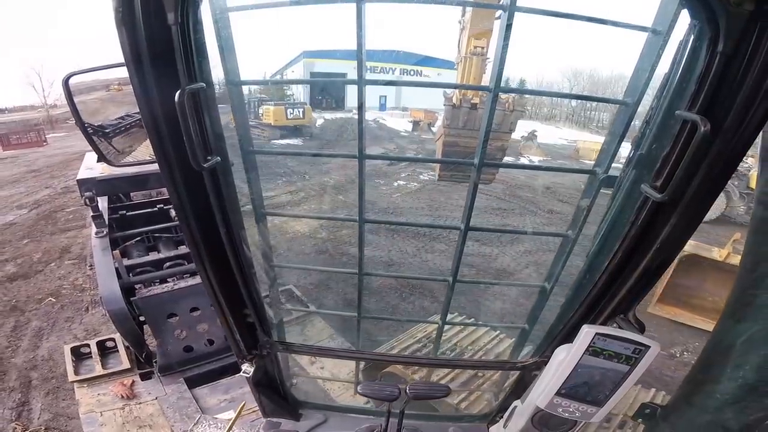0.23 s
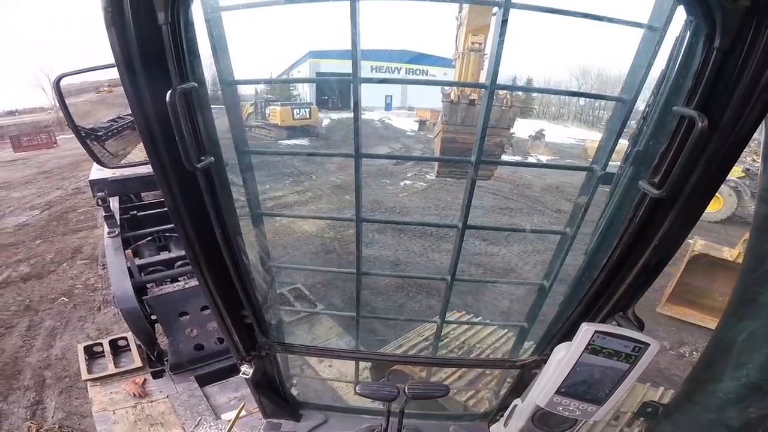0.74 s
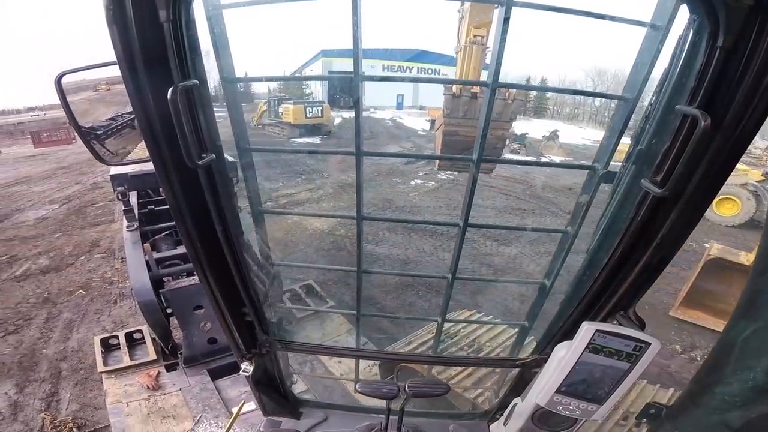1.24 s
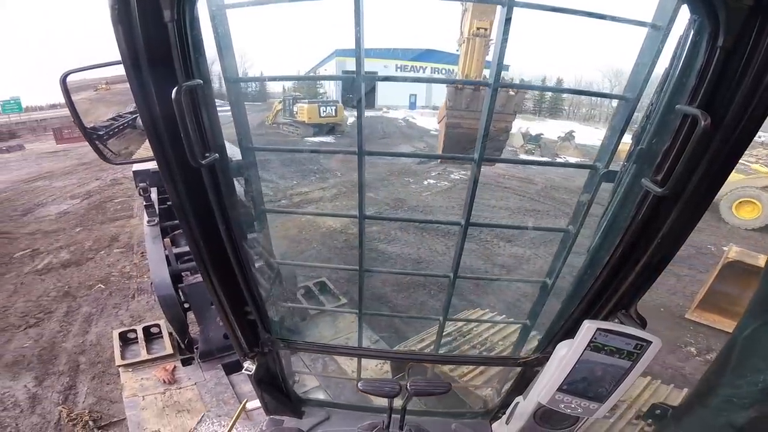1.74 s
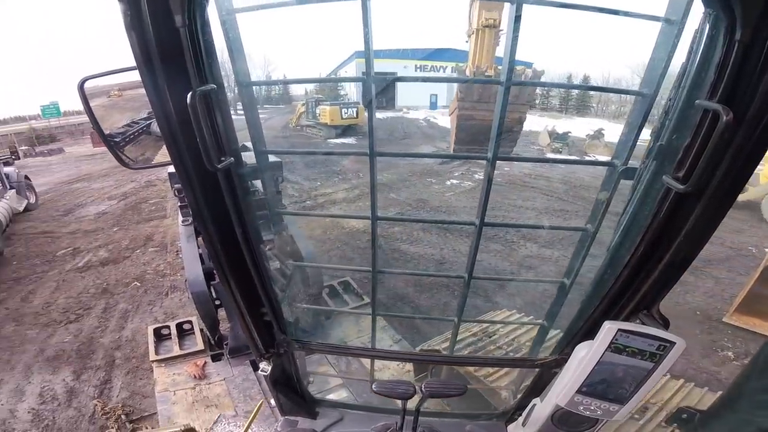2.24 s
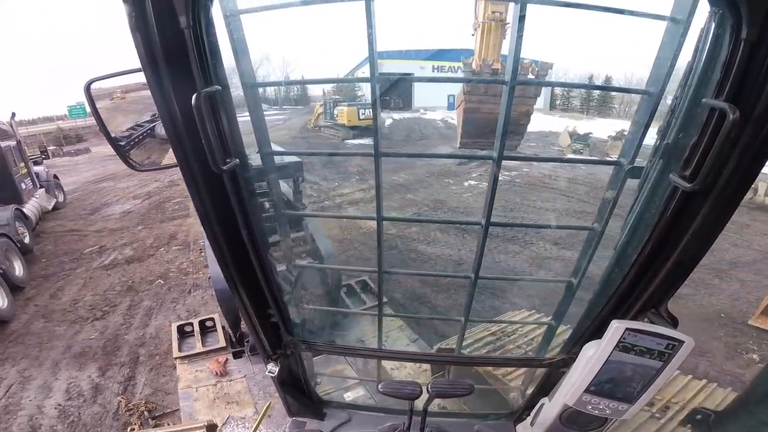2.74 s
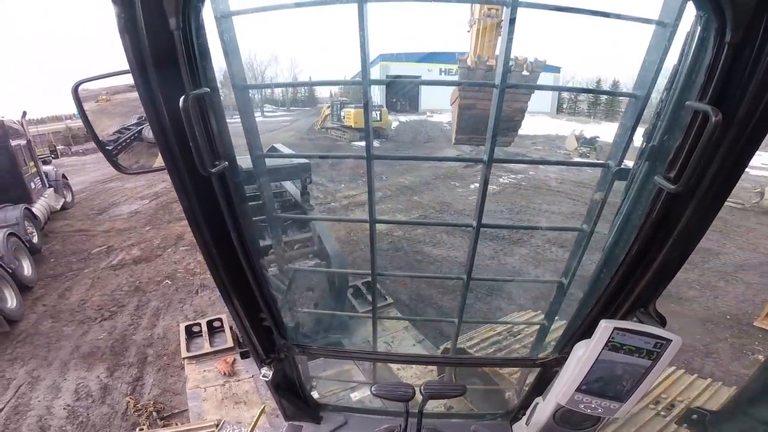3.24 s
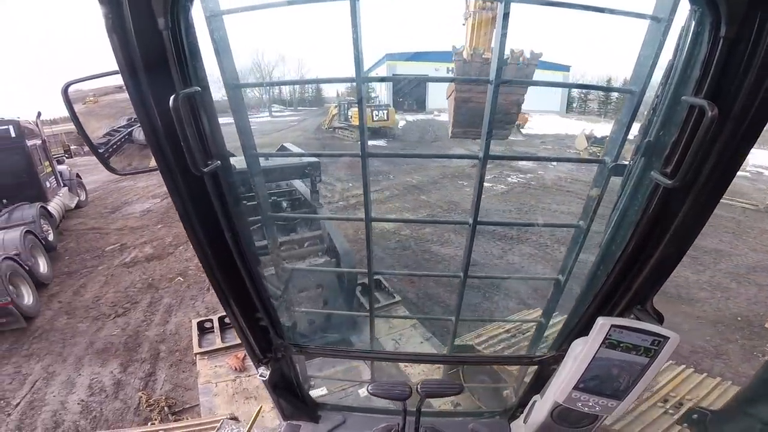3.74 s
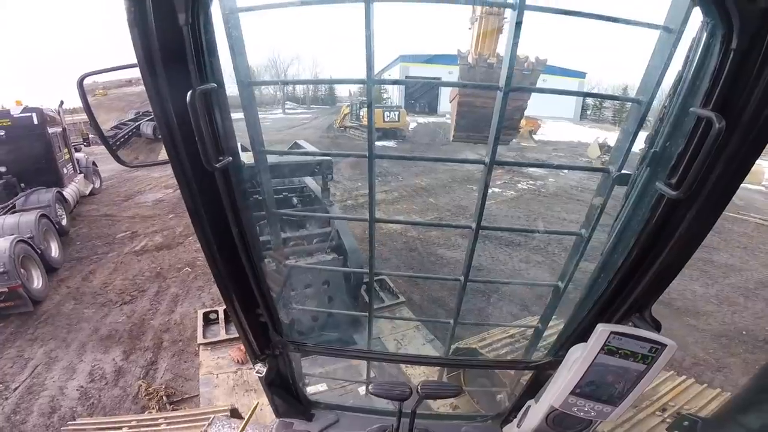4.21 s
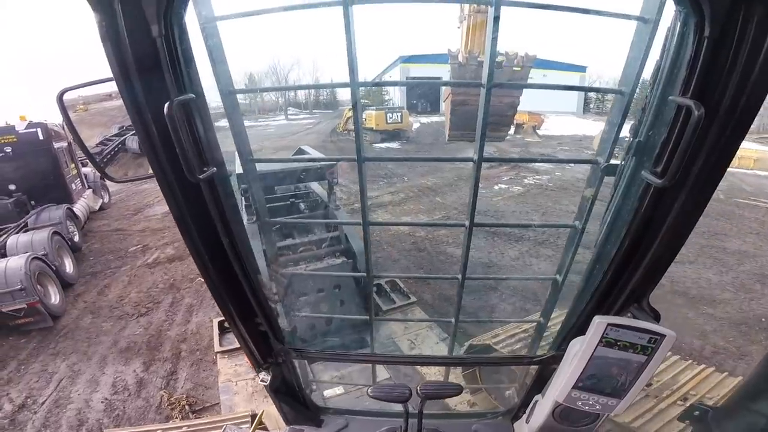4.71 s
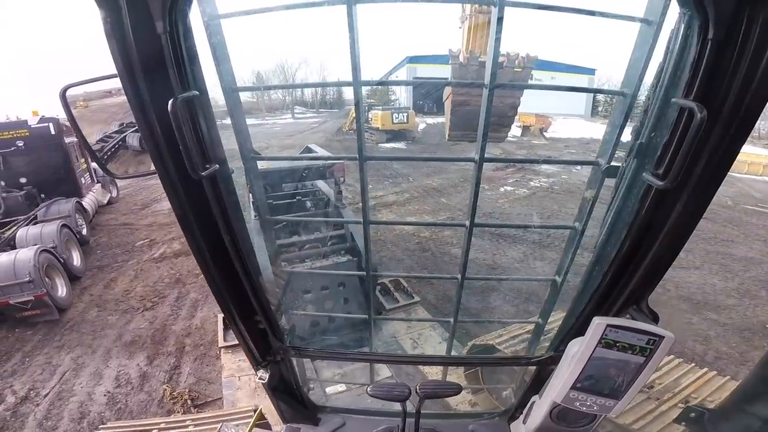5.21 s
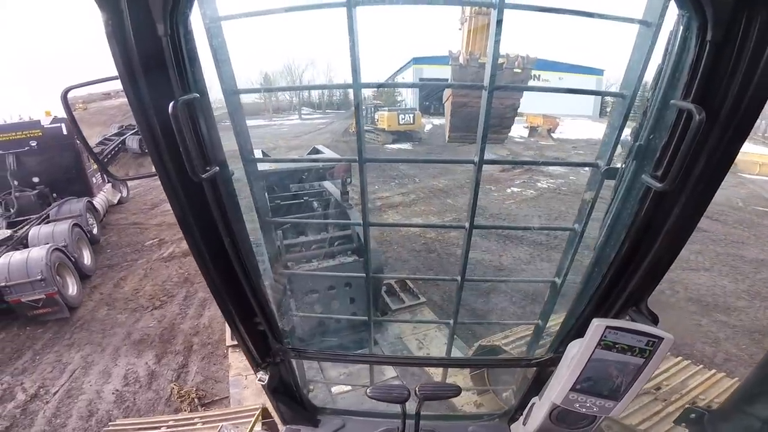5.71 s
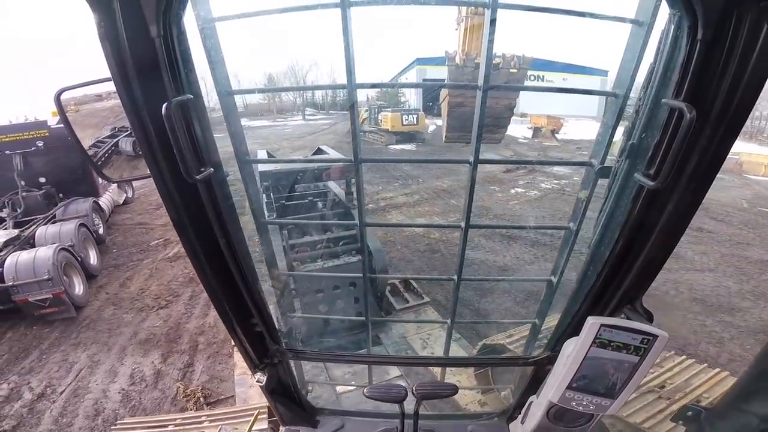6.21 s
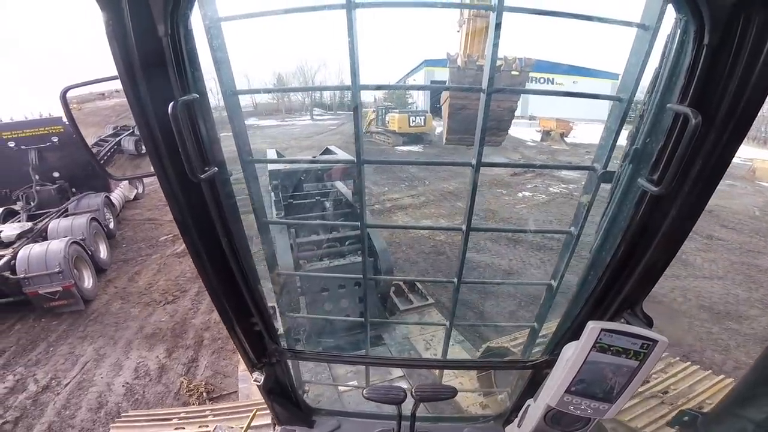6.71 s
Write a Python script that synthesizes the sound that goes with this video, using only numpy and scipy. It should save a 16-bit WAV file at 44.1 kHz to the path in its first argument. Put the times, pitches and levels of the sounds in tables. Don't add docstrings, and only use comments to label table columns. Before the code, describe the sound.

From inside a small glass-walled excavator cab, a diesel runs throughout near idle: a very deep, pulsing boom with rough growl, rumble, metallic clatter and steady airy hiss. From about 0.6 to 1.5 seconds the boom swells strongly as the pitch dips slightly. A thin, uneven bearing squeak begins around 0.7 and comes and goes until 3.7, and a soft knock lands at 1.4. From 1.7 to 3.4 the boom thins while a wavering hydraulic hum stands out, with fine high oil hiss and faint ticking. Around 3.75 the engine pitch jumps briefly with a dull knock, then sags by 4.5 as the swing stops. The boom returns, fuller and steadier, with less hum and a slightly lower hiss. Between 6.0 and 6.8 several dull steel knocks arrive, hardest near 6.4 alongside a short squeal, as the swing restarts.

```python
import sys
import numpy as np
from scipy import signal
from scipy.fft import rfft, irfft, next_fast_len
from scipy.io import wavfile
from scipy.ndimage import uniform_filter1d, map_coordinates

SR = 44100
rng = np.random.default_rng(int(sys.argv[2]) if len(sys.argv) > 2 else 0)


def log_audio(samples):
    frames = np.atleast_2d(samples).T
    limited = np.clip(frames, -1, 1)
    pcm = np.round(limited * 32767).astype(np.int16)
    wavfile.write(sys.argv[1], SR, pcm)


def gain_from_db(level_db):
    decades = np.asarray(level_db, float) / 20
    return 10 ** decades


N = 306495

# start_s, firing_hz, boom_db, pump_hum_db
ENGINE_RUN = [(0.0, 46.16, -19.5, -33.0), (0.1, 45.4, -24, -35.5), (0.2, 45.7, -21.5, -32.5),
              (0.3, 45.6, -21, -37), (0.4, 45, -16.5, -31), (0.5, 44.8, -17.5, -37),
              (0.6, 44.38, -13.0, -34), (0.7, 44.3, -9, -32), (0.8, 43.77, -9.0, -37.0),
              (0.9, 43.97, -9.0, -38.0), (1.0, 43.97, -9.5, -36.0), (1.1, 43.92, -9.0, -34),
              (1.2, 43.94, -9.0, -36.0), (1.3, 44, -9.0, -44), (1.4, 44.36, -10.0, -65.0),
              (1.5, 44.78, -10.5, -60), (1.6, 45.2, -13.0, -41), (1.7, 45.27, -17.5, -32),
              (1.8, 45.8, -29, -30.0), (1.9, 45.91, -20, -29.0), (2.0, 45.97, -15, -28),
              (2.1, 46.36, -18.0, -30), (2.2, 46.04, -19, -28.0), (2.3, 46.08, -15.5, -27.0),
              (2.4, 45.93, -18.0, -27.0), (2.5, 46, -18, -28), (2.6, 45.8, -20.0, -28),
              (2.7, 45.73, -25, -29), (2.8, 45.7, -22.5, -28.5), (2.9, 45.74, -26, -28.5),
              (3.0, 45.38, -31.0, -30), (3.1, 45.4, -33, -29.5), (3.2, 45.25, -22.5, -30.0),
              (3.3, 45.36, -20, -29.5), (3.4, 45.16, -25, -28.5), (3.5, 45.05, -19, -41),
              (3.6, 45.28, -23.0, -39), (3.65, 45.67, -17, -29), (3.7, 46.35, -25, -40),
              (3.75, 48.04, -12, -26.5), (3.8, 48.4, -11.5, -24), (3.9, 48.52, -12.5, -37),
              (4.0, 48.0, -16.5, -40), (4.1, 46.93, -21, -39.5), (4.2, 46.58, -12.5, -43),
              (4.3, 45.86, -18.5, -43.0), (4.4, 44.25, -21.5, -39), (4.5, 43.4, -11, -47),
              (4.6, 43.7, -9, -44), (4.7, 43.63, -10.5, -47.0), (4.8, 43.58, -11, -52),
              (4.9, 43.91, -10.0, -52), (5.0, 43.88, -11.5, -49.0), (5.1, 44.06, -11.5, -51.0),
              (5.2, 44.36, -11.5, -37), (5.3, 44.47, -14.0, -46), (5.4, 44.5, -13.5, -43),
              (5.5, 44.73, -14.0, -49), (5.6, 44.74, -15.5, -47.0), (5.7, 44.99, -15.0, -40),
              (5.8, 44.7, -18.5, -53.0), (5.9, 44.3, -15.0, -56), (6.0, 43.88, -12.5, -53),
              (6.1, 43.58, -11.0, -37), (6.2, 43.3, -10.5, -37.5), (6.3, 43.45, -10.0, -42),
              (6.4, 43.86, -10.0, -40), (6.5, 44.45, -11.5, -41), (6.6, 44.9, -12.5, -38),
              (6.7, 45.05, -17.5, -37.5), (6.8, 45.4, -21, -43), (6.95, 45.48, -17.5, -37)]
TONE_MULTIPLES = [2, 3, 6, 7, 10, 13]
# start_s, rumble_db, block_db, hiss_db, frame_db
LOAD_LEVELS = [(0.03, -28.5, -35, -42, -33.5), (0.18, -29.5, -34, -43.5, -34),
               (0.45, -26, -34, -44.5, -34.5), (1.02, -28.5, -35.5, -45, -36), (1.23, -32, -37, -46, -38),
               (1.71, -25.5, -36, -45.5, -35.5), (1.9, -24.5, -35, -43.5, -33.5),
               (2.15, -24, -35.5, -43, -33), (2.67, -24, -35.5, -44, -35.5),
               (3.03, -25, -35.5, -43.5, -34.5), (3.53, -22.5, -35.5, -43.5, -36),
               (3.68, -22, -35, -44, -32.5), (3.76, -26, -33, -42, -34.5), (3.8, -26, -35.5, -43, -38.5),
               (4.22, -28.5, -36, -43.5, -38.5), (4.54, -29.5, -35.5, -44, -41.5),
               (4.93, -28, -35, -43, -39.5), (5.35, -31.5, -35, -43, -38), (5.83, -26, -35.5, -43, -39.5),
               (5.86, -28, -37, -42, -37), (6.0, -27.5, -33.5, -43.5, -36.5), (6.21, -25.5, -34, -44, -39),
               (6.4, -26.5, -33.5, -43, -36), (6.9, -24.5, -34, -42, -36.5)]
# start_s, share (0-1)
SWING_FLOW = [
    (0, 0.8),
    (1.2, 0.83),
    (1.6, 1),
    (3.6, 0.9),
    (3.9, .05),
    (6, 0.04),
    (6.95, 0.4),
]


def unit(x):
    return x / np.sqrt(np.mean(x ** 2) + 1e-20)


def curves(rows):
    start_s, *columns = np.transpose(rows)
    t = np.arange(N) / SR
    return [np.interp(t, start_s, column) for column in columns]


def wobble(rate_hz):
    knots = rng.standard_normal(int(N * rate_hz / SR) + 4)
    return map_coordinates(knots, [np.arange(N) * rate_hz / SR])


def coloured(x, points):
    size = next_fast_len(N + 8192)
    hz, db = np.transpose(points)
    log_hz = np.log(np.fft.rfftfreq(size, 1 / SR) + 1)
    gain = gain_from_db(np.interp(log_hz, np.log(hz + 1), db, -120, -120))
    return unit(irfft(rfft(x, size) * gain, size)[:N])


def rush(points, patchy_db):
    spectrum = signal.stft(rng.standard_normal(N), nperseg=512)[2]
    field = uniform_filter1d(rng.standard_normal(spectrum.shape), 5, 0)
    field = uniform_filter1d(field, 8, 1)
    patchy = signal.istft(spectrum * gain_from_db(patchy_db * unit(field)), nperseg=512)[1][:N]
    return coloured(patchy, points)


def cab(x, t60, wet_db):
    t = np.arange(SR // 10) / SR
    tails = rng.standard_normal((2, len(t))) * gain_from_db(-60 * t / t60)
    tails = tails / np.linalg.norm(tails[0])
    echoes = signal.fftconvolve(x[None], tails, axes=1)[:, :N]
    turn = np.pi / 2 * np.clip(curves(SWING_FLOW)[0], 0, 1)
    wet = gain_from_db(wet_db) * (np.sin(turn) * echoes[0] + np.cos(turn) * echoes[1])
    return (x + wet) / np.sqrt(1 + gain_from_db(2 * wet_db))


def oil():
    # hz, db per Hz
    flow_colour = [(6500, -20), (7300, 1), (8100, -6.5), (8800, 0.5), (9800, -14)]
    # hz, db per Hz
    relief_colour = [(4500, -21), (5150, -1), (5700, -10.5), (6100, -22), (6750, -9.5), (7500, -26)]
    share = np.clip(curves(SWING_FLOW)[0], 0, 1)
    swinging = gain_from_db(-62.5) * share * rush(flow_colour, patchy_db=3)
    resting = gain_from_db(-57.5) * (1 - share) * rush(relief_colour, patchy_db=3.5)
    return swinging + resting


def panels():
    # pitch_hz, width_hz, level_db
    modes = [(419, 33, 0), (530.8, 28, -5), (678, 25, -2), (800, 31, -9), (1000, 40, -5), (1105, 31, -10.5),
             (1458, 70, -10), (1700, 67, -22.5), (1954, 58, -15.5), (2207, 19, -23), (2565, 50, -16),
             (2740, 80, -20.5)]
    f = np.fft.rfftfreq(N, 1 / SR)
    white = rfft(rng.standard_normal(N))
    out = np.zeros(N)
    for hz, width_hz, db in modes:
        half = width_hz / 2
        ring = irfft(white * half ** 2 / ((f - hz) ** 2 + half ** 2), N)
        out += gain_from_db(db + 2.5 * wobble(1.63)) * ring
    return unit(out)


def clatter(firings):
    # hz, db per Hz
    rumble_colour = [(15, -11), (25, -4.5), (40, -9), (60, -3.5), (100, -2), (160, -6.5), (200, -23.5),
                     (260, -44.5)]
    frame_colour = [(150, -26), (185, 0.5), (215, -7.5), (260, -5), (330, -4.5), (400, -7.5), (480, -30.5)]
    block_colour = [(300, -32), (390, -5), (450, -6), (680, -3.5), (880, -8), (1100, -3), (1300, -12.5),
                    (1600, -9), (1900, -16), (2600, -31)]
    hiss_colour = [(1200, -20.5), (2000, -1), (2800, -2), (3900, -8.5), (4450, -11), (5200, -5),
                   (5700, -15.5), (6030, -22), (6600, -15.5), (8000, -19.5), (9200, -22.5), (10200, -30),
                   (12500, -35.5), (15300, -39.5)]
    cylinder_levels = [0.29, -1.1, 1.5, -0.3, -0.43, -1.7]
    rumble_db, block_db, hiss_db, frame_db = curves(LOAD_LEVELS)
    cylinder_db = np.interp(firings % 6, np.arange(7), cylinder_levels + cylinder_levels[:1])
    puff = np.cos(2 * np.pi * (firings - .4))
    rumble = gain_from_db(rumble_db - 10.5) * rush(rumble_colour, patchy_db=3.0)
    frame = gain_from_db(frame_db - 5) * rush(frame_colour, patchy_db=1.5)
    block = rush(block_colour, patchy_db=0.3) + gain_from_db(-2) * panels()
    block *= gain_from_db(block_db - 1.0 + 0.86 * cylinder_db + 0.55 * puff)
    hiss_db = hiss_db + .6 * cylinder_db + .5 * puff + 0.46 * wobble(18)
    hiss = gain_from_db(hiss_db) * rush(hiss_colour, patchy_db=0.97)
    return rumble + frame + block + hiss


def knocks():
    # start_s, level_db, t60_s
    impacts = [
        (1.4, -42, .05),
        (2.94, -41, 0.07),
        (3.75, -41, .12),
        (6.04, -40, .05),
        (6.3, -42, 0.05),
        (6.435, -35, 0.078),
        (6.57, -41, 0.068),
        (6.8, -42, 0.061),
    ]
    # hz, db
    steel_colour = [(300, -23), (900, -5.5), (2700, -7), (4000, -5), (5200, -19), (6000, -25), (7000, -10),
                    (8000, -21), (9500, -26), (11000, -45)]
    t = np.arange(N) / SR
    shape = np.zeros(N)
    for start_s, db, t60 in impacts:
        attack = np.clip((t - start_s) / .016, 0, 1) ** 2
        shape += attack * gain_from_db(db + 8 - 60 * np.maximum(t - start_s, 0) / t60)
    return shape * rush(steel_colour, patchy_db=2.0)


def valve(firings):
    # start_s, level_db
    tick_levels = [(0.03, -73.5), (0.58, -75), (0.76, -76), (1.71, -79), (1.81, -75), (3.45, -78),
                   (3.68, -66), (3.7, -76), (6.78, -78), (6.9, -79)]
    window = np.exp(-((firings + 3.2) % 6 - 3) ** 2 / .3)
    level = gain_from_db(curves(tick_levels)[0] - 0.5 + 2.5 * wobble(6))
    level *= .25 + curves(SWING_FLOW)[0]
    return level * window * rush([(9900, -25.5), (10800, -1), (11800, -19)], patchy_db=0.5)


def squeal():
    # start_s, level_db, pitch_hz
    squeals = [
        [(0.7, -73, 4330), (0.72, -57, 4320), (0.77, -68, 4342), (0.83, -55, 4360), (0.92, -65, 4351),
         (0.99, -53, 4350), (1.15, -61, 4369), (1.4, -49, 4410), (1.48, -66, 4441), (1.54, -49, 4460),
         (1.59, -56, 4408), (2.08, -52, 4385), (2.21, -52, 4364), (2.23, -47.5, 4413), (2.7, -55, 4334),
         (3.01, -50, 4310), (3.09, -62, 4290), (3.1, -49, 4280), (3.15, -68, 4280), (3.29, -46, 4293),
         (3.33, -62, 4246), (3.37, -47, 4300), (3.71, -54, 4270), (3.73, -69, 4180), (3.75, -56, 4160)],
        [(6.38, -53, 4223), (6.428, -61, 3900), (6.444, -43, 4090), (6.498, -65, 4144), (6.516, -51, 4147),
         (6.704, -52, 4226), (6.9, -60, 4160)],
    ]
    t = np.arange(N) / SR
    out = np.zeros(N)
    for rows in squeals:
        db, hz = curves(rows)
        fade = np.clip(np.minimum(t - rows[0][0], rows[-1][0] - t) / .05, 0, 1)
        catches = unit(gain_from_db(1.2 * wobble(45)) * wobble(290))
        carrier = np.sqrt(2) * np.sin(2 * np.pi * np.cumsum(hz) / SR)
        out += fade * gain_from_db(db - 2.5) * catches * carrier
    return out


def cycle_comb(firings, db, memory, drift):
    cycle = firings / 6
    count, size = int(firings[-1] / 6) + 2, 4096
    fresh = rng.standard_normal((count, len(db))) + 1j * rng.standard_normal((count, len(db)))
    keep = np.clip(memory, 0, .95)
    change = signal.lfilter([np.sqrt(1 - keep ** 2)], [1, -keep], fresh, axis=0)
    steady = fresh[0] / abs(fresh[0])
    shapes = irfft(gain_from_db(db) * (steady + drift * change), size)
    wrapped = np.c_[shapes, shapes[:, 0]]
    return unit(map_coordinates(wrapped, [cycle, cycle % 1 * size], order=1))


def growl(firings):
    # cycle_order, level_db
    low_orders = [(3, -4), (4, -12.5), (5, -1), (7, -10.5), (8, -8.5), (9, -0.5), (10, -2), (11, -4),
                  (13, -7.5), (14, 0.5), (15, -10), (16, -9), (17, -8), (19, -10.5), (20, -6.5), (21, 0),
                  (22, -5), (24, -7), (25, -13.5), (26, -8.5), (30, -14.5), (31, -14.5), (32, -7),
                  (33, -22), (34, -16.5), (40, -20.5), (44, -13.5), (48, -11.5)]
    # hz, db
    shell_response = [(330, -26.5), (400, -9.5), (520, 4), (620, -9.5), (700, -6), (850, -10), (1050, -7),
                      (1500, -9), (2200, -32.5)]
    rumble_db, block_db, _, frame_db = curves(LOAD_LEVELS)
    order = np.arange(300)
    listed_db = np.full(len(order), -90.)
    for k, db in low_orders:
        listed_db[int(round(k))] = db
    below = order < 23
    high_db = 3.2 * (order % 6 == 0) + 1.8 * (order % 3 == 0)
    high_db[6 * np.array([1, 9] + TONE_MULTIPLES)] = -60
    low = cycle_comb(firings, listed_db - 90 * ~below, memory=.82, drift=.65)
    middle = cycle_comb(firings, listed_db - 90 * below, memory=.9, drift=.5)
    high = coloured(cycle_comb(firings, high_db, memory=0.72, drift=0.86), shell_response)
    return gain_from_db(rumble_db - 2.5) * low + gain_from_db(frame_db - 3.5) * middle + gain_from_db(block_db - 3) * high


def tones(firings):
    # start_s, then level_db of each of TONE_MULTIPLES
    harmonic_levels = [(0.0, -30, -46.0, -47.0, -39, -53, -61.0), (0.2, -32, -41, -42.5, -55, -46, -61),
                       (0.4, -35, -32, -44, -55, -45.5, -58), (0.6, -40, -35, -47.0, -50, -29, -44),
                       (0.79, -34, -36.0, -52, -58, -34, -38), (0.99, -38, -35, -61, -40, -35, -38.5),
                       (1.19, -46, -36, -77.0, -41.5, -38, -38.5),
                       (1.39, -42, -32, -39, -49.5, -34.5, -42.5), (1.59, -29.0, -46, -43.0, -40, -40, -67),
                       (1.79, -28.0, -35.0, -65.0, -44, -38, -51.0), (1.99, -41, -57, -41.5, -45, -43, -57),
                       (2.18, -42, -39.0, -41.5, -51, -44, -52), (2.38, -45, -49, -45, -46.0, -43, -56),
                       (2.58, -47, -34, -63, -49, -38.5, -57), (2.78, -35, -37, -56, -48, -33, -51),
                       (2.98, -46, -37.0, -44, -54, -34.5, -46), (3.18, -32, -39, -41, -52, -36, -44),
                       (3.38, -27, -44, -38, -45, -40, -45), (3.57, -25.5, -26.5, -38.5, -45, -38.5, -44),
                       (3.77, -33, -32.5, -36, -60.0, -53.0, -64.0),
                       (3.97, -30.5, -38, -36.5, -53, -49.0, -60.0),
                       (4.17, -30.0, -32.5, -51, -66.0, -67.0, -67.0),
                       (4.37, -29, -40.0, -41.5, -48, -62, -68), (4.57, -36, -46, -67, -57, -52.0, -59),
                       (4.77, -38.0, -39, -47, -66, -54, -45), (4.96, -40, -49, -46.5, -58, -68.0, -51),
                       (5.16, -37, -49, -48.5, -61, -74, -40), (5.36, -29.5, -46, -44, -56, -71, -61),
                       (5.56, -33, -36.0, -41, -50, -64.0, -62), (5.76, -34, -41, -43.5, -42.5, -61, -56),
                       (5.96, -41, -45, -45.5, -55, -53, -48), (6.16, -38, -60.0, -44, -46.0, -39, -49),
                       (6.35, -35, -47, -36, -35.5, -36.5, -45), (6.55, -41, -48, -46.5, -42.5, -54, -59),
                       (6.75, -37.0, -32, -41, -42, -52, -61), (6.95, -40, -41, -40, -51, -54, -59)]

    def sine(multiple):
        return np.sqrt(2) * np.sin(2 * np.pi * (multiple * firings + rng.random()))

    _, boom_db, hum_db = curves(ENGINE_RUN)
    out = gain_from_db(boom_db + .7 * wobble(16)) * sine(1)
    out += gain_from_db(hum_db + .8 * wobble(25)) * sine(9)
    for multiple, db in zip(TONE_MULTIPLES, curves(harmonic_levels)):
        out += gain_from_db(db + 0.74 * wobble(9)) * sine(multiple)
    return out


def scene():
    firings = np.cumsum(curves(ENGINE_RUN)[0]) / SR
    noise = cab(clatter(firings) + oil() + knocks(), t60=.1, wet_db=-16)
    mix = noise + valve(firings) + squeal() + growl(firings) + tones(firings)
    return mix[None]


def top_cut(x):
    return signal.sosfilt(signal.butter(12, 15270, fs=SR, output="sos"), x)


def record(dry):
    mix = dry + .0012
    return top_cut(mix)


dry = scene()
out = record(dry)
log_audio(out)
```